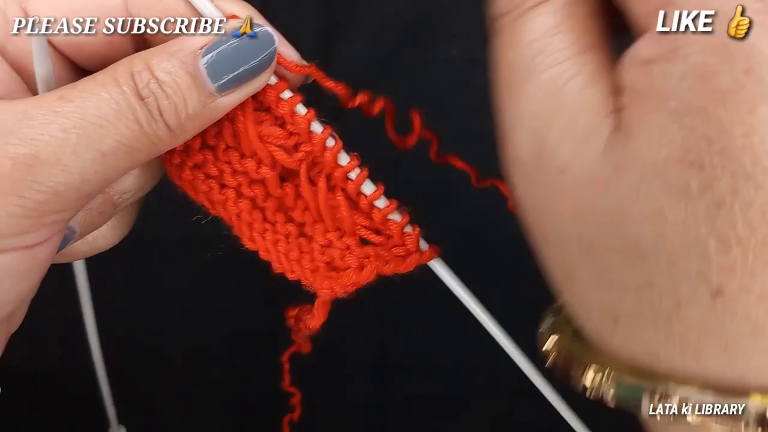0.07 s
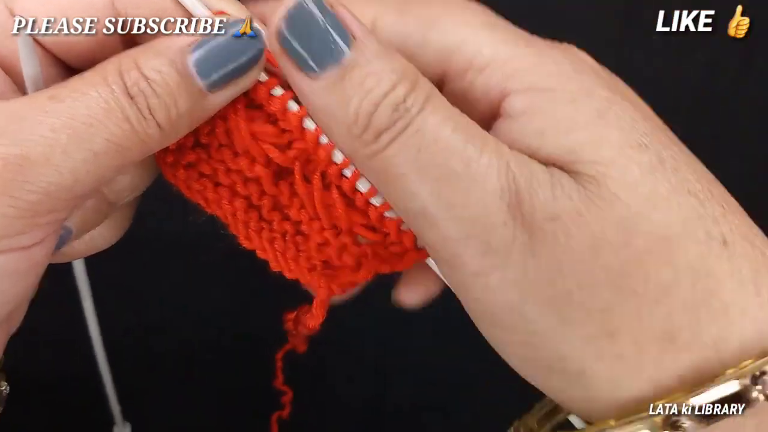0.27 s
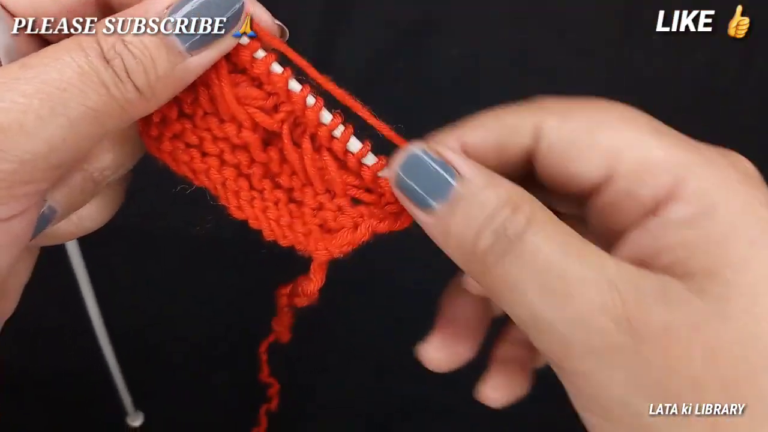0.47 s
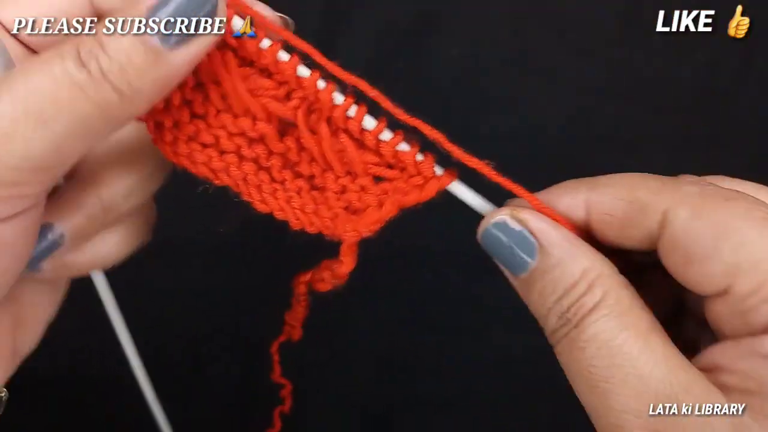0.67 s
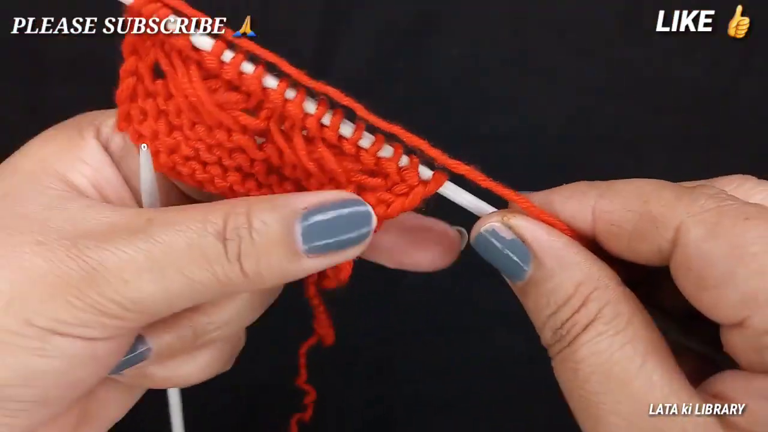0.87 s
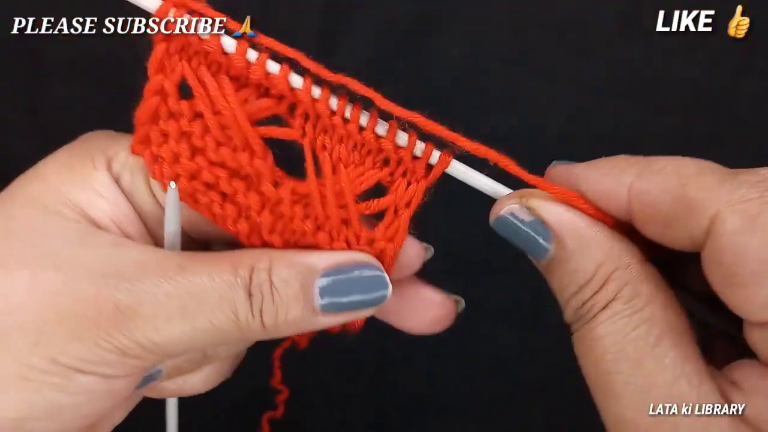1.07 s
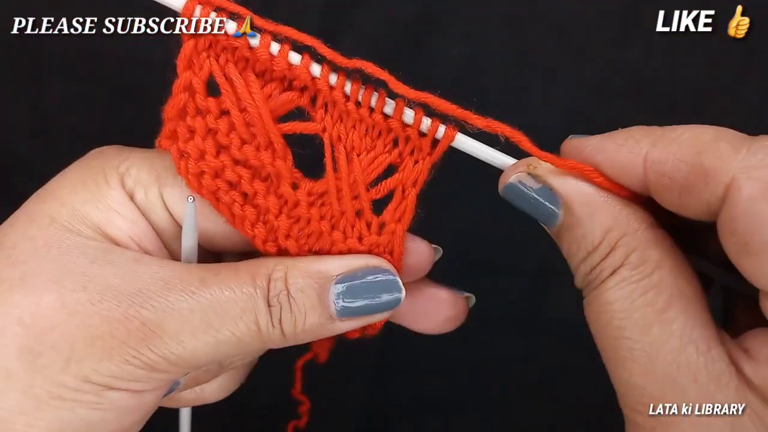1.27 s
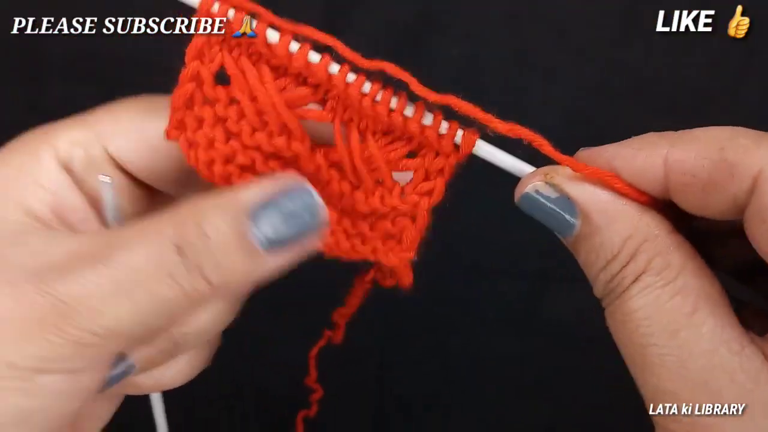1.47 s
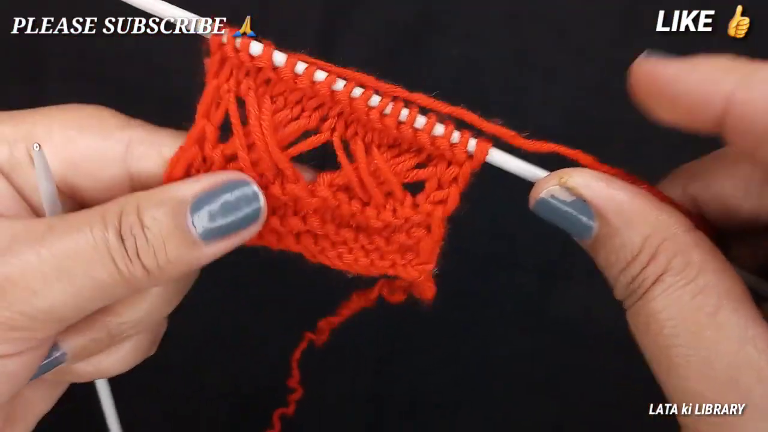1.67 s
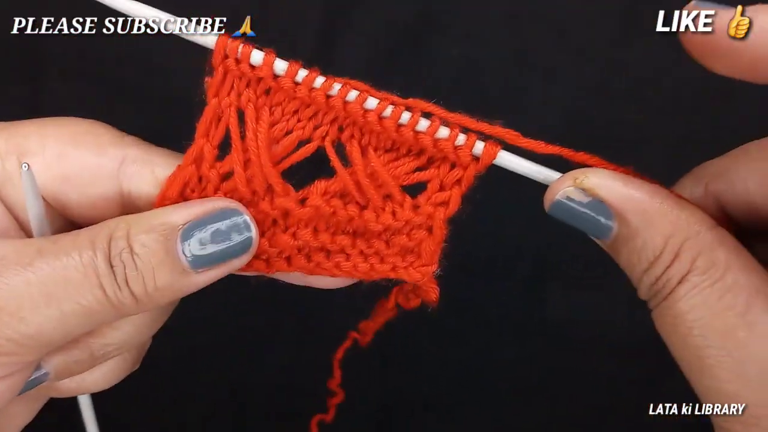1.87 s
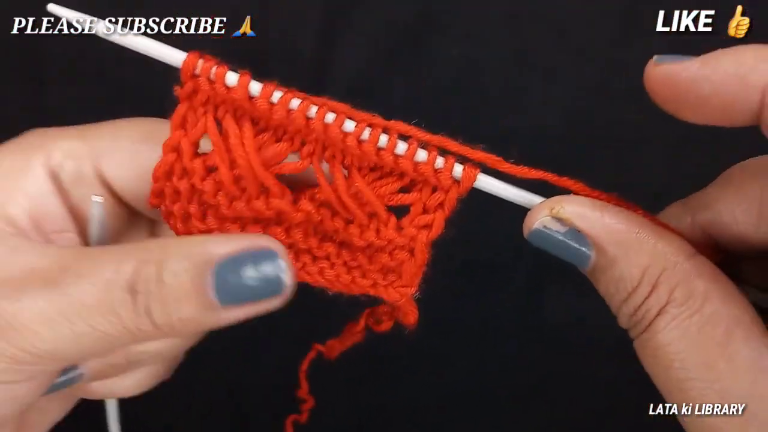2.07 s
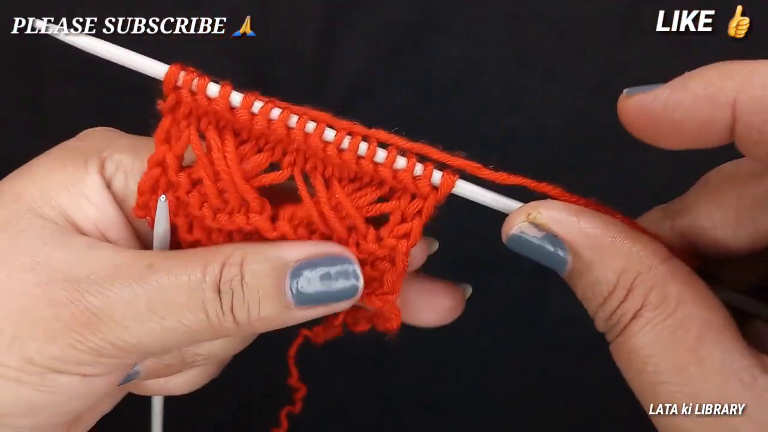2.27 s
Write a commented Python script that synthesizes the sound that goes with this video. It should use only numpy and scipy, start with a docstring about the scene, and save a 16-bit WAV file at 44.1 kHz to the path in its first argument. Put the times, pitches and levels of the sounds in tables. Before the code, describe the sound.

A loose metal knitting needle ticks and scrapes faintly, then clicks hard at half a second and scrapes briefly; soft yarn rustling follows, with two faint distant clock ticks, close phone microphone in a small furnished room.

```python
"""A loose metal knitting needle, close up, taps, scrapes, clicks hard, scrapes again and taps faintly.
Band-limited impulses and stick-slip grit ring its decaying modes. Yarn rustles under the fingers as
showers of tiny snags, with a narrow hiss of noise where it slides. Far off a wall clock ticks twice,
a second apart: brief rattles ring its case. Coloured noise makes room rumble and hiss; its lows are
by chance a little louder around 0.62 s. A nearly mono phone microphone hears a small furnished room."""
import sys
import numpy as np
from scipy import signal
from scipy.fft import rfft, irfft
from scipy.io import wavfile
from scipy.ndimage import uniform_filter1d

SR = 44100
rng = np.random.default_rng(int(sys.argv[2]) if len(sys.argv) > 2 else 0)


def makeup_ratio(level_db):
    """Linear amplitude ratio for a level in decibels (20 dB per factor of ten)."""
    decades = np.asarray(level_db, float) / 20
    return 10 ** decades


def to_wav(s):
    """Save 16-bit WAV."""
    ch = np.atleast_2d(s).T  # columns
    pcm = np.round(np.clip(ch, -1, 1) * 32767)  # PCM
    wavfile.write(sys.argv[1], SR, pcm.astype(np.int16))


N = 102576
T = np.arange(N) / SR
# contact grit, shared by the scraping needle and the rattling clock
IMPACTS_PER_S, IMPACT_SCATTER_DB = 6000, 2.5


def unit(x):
    """Scales to rms 1."""
    return x / np.sqrt(np.mean(x ** 2))


def colour(x, points):
    """Shapes a spectrum by (Hz, dB) points joined on a log axis."""
    hz, db = np.array(points, float).T
    f = np.fft.rfftfreq(len(x), 1 / SR) + 1
    return irfft(rfft(x) * makeup_ratio(np.interp(np.log(f), np.log(hz), db)), len(x))


def thin(x, hz):
    """Steep bass cut."""
    return signal.sosfilt(signal.butter(3, hz, "high", fs=SR, output="sos"), x)


def pole(t60):
    """Per-sample decay that falls 60 dB in t60 seconds, at least 0.8 ms."""
    return np.exp(-np.log(1000) / (max(t60, .0008) * SR))


def ring(x, hz, t60):
    """One mode, whose pitch may move, driven by x; it builds up briefly, which keeps its skirts steep."""
    build_up = .22  # rise time as a share of the decay
    turn = np.exp(2j * np.pi * np.cumsum(hz * np.ones(N)) / SR)
    decay, rise = pole(t60), pole(t60 * build_up)
    poles = np.convolve([1, -rise], [1, -decay])
    return (turn * signal.lfilter([1 - rise], poles, x / turn)).imag


def walk(rate):
    """Random levels held 1 / rate s and slewed; rms 1."""
    hold = int(SR / rate)
    steps = np.repeat(rng.standard_normal(N // hold + 1), hold)
    return unit(uniform_filter1d(uniform_filter1d(steps, hold), hold)[:N])


def grit(rate, scatter_db):
    """Random tiny impacts of either sign, a few much larger than the rest; rms 1."""
    chance, sign, size = rng.random((3, N))
    return unit((chance < rate / SR) * np.sign(sign - .5) * makeup_ratio(-scatter_db * np.log(1 - size)))


def click(s):
    """A band-limited impulse of peak 1 at time s."""
    k = (T - s) * SR
    return np.sinc(k) * np.exp(-(k / 8) ** 2)


def tap_forces():
    """Each tap is one impulse whose colour and mode balance depend on touch point and grip."""
    # taps: start_s, level_db, tilt_db_per_octave, tip_modes_db, body_modes_db
    taps = [(.3743, -33, -1, -10, 7), (.3768, -33, -3, -10, 7), (.3858, -37, 1, -10, 8),
            (.3885, -38, -1, -8, 8), (.3948, -35, 1, -4, 7), (.4075, -40, 1, 2, 7), (.4190, -40, 0, 4, 7),
            (.4310, -39, 0, 2, 7), (.4410, -42, 0, 3, 7), (.4475, -41, 1, 5, 4), (.4985, -13, -1, 9, -4),
            (.4994, -19, -1, 5, -3), (.5006, -17, -2, -4, -4), (.5075, -35, 0, 0, -3),
            (.5335, -31, 0, 2, -3), (.5385, -26, 3, 0, -3), (.5460, -38, 2, -3, -3),
            (1.0975, -58, 0, -6, 0), (1.1880, -61, 4, -3, -3)]
    return [(makeup_ratio(db) * click(s), *shape) for s, db, *shape in taps]


def scrape_forces():
    """Stick-slip: stuttering grit follows the pressure of each scrape."""
    # pressure of each scrape: time_s, level_db, tilt_db_per_octave, tip_modes_db, body_modes_db
    scrapes = [
        [(.385, -74, -9.5, -13, 20), (.396, -67.5, -11.5, 3, 9.5), (.41, -67.5, 4.5, 2, 18.5),
         (.425, -61.5, 2.5, 3, 8.5), (.445, -56, 2.5, -13, 6.5), (.459, -61, 1, 9, 3), (.462, -76, -2, -8, 3),
         (.495, -86, -2, -8, 3)],
        [(.502, -55, -3, -5, -13), (.51, -47.5, -9.5, 15, -10), (.522, -46.5, -4.5, 10.5, -6),
         (.53, -53, 11.5, 3, -1), (.541, -63.5, -9, 1, 0.5), (.544, -65, 3.5, -4, 9), (.56, -67, -3, -1, 1),
         (.62, -80.5, -3, -12, -3)],
    ]
    stutter_db, stutter_per_s = 2.5, 500
    slips = grit(IMPACTS_PER_S, IMPACT_SCATTER_DB) * makeup_ratio(stutter_db * walk(stutter_per_s))
    forces = []
    for rows in np.array(scrapes, float):
        s, db, *shape = rows.T
        inside = (T > s[0]) & (T < s[-1])
        pressure = inside * slips * makeup_ratio(np.interp(T, s, db))
        forces.append((pressure, *(np.interp(T, s, c) for c in shape)))
    return forces


def mode_force(forces, hz, group):
    """What one mode receives: spectral tilt about 5 kHz, plus the favour shown to its group."""
    octaves = np.log2(hz / 5000)
    return sum(x * makeup_ratio(tilt * octaves + tip * (group == "tip") + body * (group == "body"))
               for x, tilt, tip, body in forces)


def needle():
    """Taps and stick-slip scraping drive the same metal modes; their balance follows contact and grip."""
    # pitches of the needle's modes: pitch_hz
    mode_pitches = [1290, 1815, 2450, 2750, 3050, 3400, 4150, 4550, 4850, 5270, 6000, 6400, 7100, 7800,
                    8300, 8750, 11830, 12200, 12950, 14080, 14700]
    # the same modes in order: level_db, t60_s, group (tip, body, top or none)
    mode_rings = [(-72, 0.0093, ""), (-36.5, 0.053, "body"), (-31.5, 0.0091, "body"),
                  (-25.5, 0.011, "body"), (-17.5, 0.01, "body"), (-23.5, 0.0088, ""), (-19.5, 0.0093, ""),
                  (-20.5, 0.013, "body"), (-13, 0.0099, "body"), (-11, 0.012, ""), (-12, 0.016, ""),
                  (-16.5, 0.0078, "body"), (-23.5, 0.0084, ""), (-18.5, 0.014, ""), (-11, 0.0048, ""),
                  (-21, 0.0026, ""), (-8, 0.012, "tip"), (-19, 0.0099, "tip"), (-33, 0.01, ""),
                  (-9.5, 0.011, "top"), (-19, 0.0076, "")]
    # top mode rising as the contact slides along the needle: time_s, share_of_pitch
    top_glide = [(.40, .962), (.43, .968), (.455, 1)]
    # colour of the contact heard directly while scraping: frequency_hz, gain_db
    rasp = [(1500, -36), (2600, -4), (6000, -6), (8500, -8), (10000, -25), (12800, -6), (15000, -8)]
    wander_db, wander_per_s = 2.5, 70  # each mode's share of a scrape wanders as the contact slides
    pitch_wander = .008  # share by which grip detunes each mode
    taps, scrapes = tap_forces(), scrape_forces()
    out = colour(sum(x for x, *_ in scrapes), rasp)
    for hz, (db, t60, group) in zip(mode_pitches, mode_rings):
        pitch = hz * (1 + pitch_wander * walk(wander_per_s))
        if group == "top":
            pitch = pitch * np.interp(T, *np.array(top_glide).T)
        scraping = mode_force(scrapes, hz, group) * makeup_ratio(wander_db * walk(wander_per_s))
        out = out + makeup_ratio(db) * ring(mode_force(taps, hz, group) + scraping, pitch, t60)
    return thin(out, 900)  # a thin rod radiates little below this


def yarn():
    """Fibres snag on skin and needle as the hands move: a dense shower of tiny impacts."""
    # handling loudness: time_s, level_db
    handling = [(0, -79.5), (.55, -63.5), (.6, -72), (.75, -62.5), (.9, -71), (1.05, -71), (1.12, -64.5),
                (1.199, -65.5), (1.298, -73), (1.44, -76), (1.46, -62.5), (1.48, -61.5), (1.51, -67),
                (1.6, -70.5), (1.749, -65.5), (1.9, -73.5), (2.03, -72), (2.065, -64.5), (2.11, -72),
                (2.33, -73)]
    # colour of the rustle: frequency_hz, density_db_per_hz
    rustle_colour = [(1200, -8), (2500, -4.5), (4500, 2.5), (7000, -3), (10000, -8.5), (12500, -6),
                     (15000, 3)]
    fibres_per_s, scatter_db = 9000, 1.5
    s, db = np.array(handling).T
    return unit(colour(grit(fibres_per_s, scatter_db), rustle_colour)) * makeup_ratio(np.interp(T, s, db))


def brush():
    """Yarn sliding: faint noise through one heavily damped resonance that drifts a little in pitch."""
    # sliding loudness: time_s, level_db
    sliding = [(.56, -97), (.63, -69.5), (.675, -70), (.7, -74), (.83, -83), (.88, -97), (1.62, -90),
               (1.65, -76), (1.71, -69.5), (1.76, -74), (1.8, -79), (1.84, -93)]
    s, db = np.array(sliding).T
    pitch = 5000 * (1 + .017 * walk(15.4))
    hiss = unit(ring(rng.standard_normal(N), pitch, .003))
    return hiss * makeup_ratio(np.interp(T, s, db)) * (T > s[0]) * (T < s[-1])


def rattle(s):
    """Level of a brief rattle that starts at time s and dies away."""
    return (T > s) * np.exp(-np.abs(T - s) / .009)


def clock():
    """The pawl lifts softly just before it drops; each move rattles briefly and rings the clock case."""
    # ticks: drop_start_s, drop_level_db, lift_against_drop_db
    ticks = [(0.663, -67.5, -18), (1.668, -76.5, -3.5)]
    # modes of the case: pitch_hz, level_db, t60_s
    case = [(1193, -17, 0.025), (1700, -5, 0.0077), (3800, 4.5, 0.016), (4180, 0, 0.012),
            (5200, -12, 0.008), (5750, -17, 0.0066)]
    lead_s = .021  # from lift to drop
    moves = sum(makeup_ratio(db) * (rattle(s) + makeup_ratio(lift_db) * rattle(s - lead_s)) for s, db, lift_db in ticks)
    force = grit(IMPACTS_PER_S, IMPACT_SCATTER_DB) * moves
    return thin(sum(makeup_ratio(db) * ring(force, hz, t60) for hz, db, t60 in case), 540)


def room(x, t60):
    """A small furnished room: a decaying coloured noise tail that fades in after a short gap."""
    # colour of the tail: frequency_hz, gain_db
    tail_colour = [(500, 9.5), (5000, -2), (9000, 0), (12000, -14), (15000, 6)]
    gap_s = .0049
    t = T[:SR // 2]
    tail = colour(rng.standard_normal(len(t)), tail_colour) * makeup_ratio(-60 * t / t60)
    tail = tail * np.clip(t / gap_s - 1, 0, 1)
    return signal.fftconvolve(x, tail / np.sqrt(np.sum(tail ** 2)))[:N]


def reverb(near, far):
    """Room sound of both distances: little from the near hands, much from the far clock."""
    return makeup_ratio(-14) * room(near, .4) + makeup_ratio(5.5) * room(far, .38)


def air():
    """Steady hiss and room rumble as coloured noise in mid, and independent noise in side."""
    # colour of rumble and hiss: frequency_hz, density_db_per_hz
    air_colour = [(12, -31), (20, -10.5), (44, 1.5), (101, 1), (158, -2.5), (260, -12.5), (316, -14),
                  (494, -14.5), (537, -16.5), (1350, -21.5), (1510, -22), (3680, -23.5), (9500, -31.5),
                  (15700, -26)]
    # level of the independent side noise: frequency_hz, side_against_mid_db
    side_levels = [(40, -33.5), (125, -50), (250, -23), (500, -19.5), (1000, -14), (3000, -14),
                   (8000, -1.5), (15000, -2.5)]
    # low noise, by chance a little louder for a moment: time_s, width_s, peak_db
    louder_lows = (.62, .08, 6)
    centre_s, width_s, peak_db = louder_lows
    mid, side = (colour(rng.standard_normal(N), air_colour) for _ in range(2))
    gain = makeup_ratio(-63) / np.std(mid)
    low = signal.sosfiltfilt(signal.butter(2, 200, fs=SR, output="sos"), mid)
    low_gain = makeup_ratio(peak_db * np.exp(-((T - centre_s) / width_s) ** 2))
    return gain * (mid - low + low * low_gain), gain * colour(side, side_levels)


def scene():
    """Near needle and yarn, far clock, room and air, spread from mid and side."""
    near, far = needle() + yarn() + brush(), clock()
    mid, side = air()
    mid = mid + near + far + reverb(near, far)
    side = side + makeup_ratio(-30) * reverb(near, far)  # fresh tails, independent of those in mid
    return np.array([mid + side, mid - side])


def roll_off(x):
    """The treble ends steeply here."""
    return signal.sosfilt(signal.butter(12, 16460, fs=SR, output="sos"), x)


def record(dry):
    """The phone cuts the top steeply above 15.68 kHz."""
    top_cut = signal.ellip(10, .3, 40, 15680, fs=SR, output="sos")
    mix = signal.sosfilt(top_cut, dry)
    return roll_off(mix)


dry = scene()
out = record(dry)
to_wav(out)
```